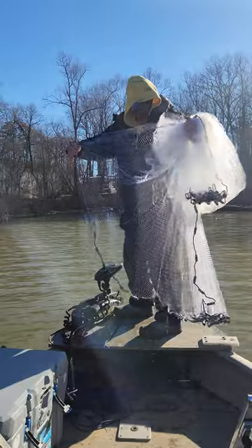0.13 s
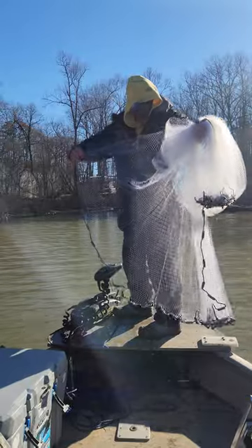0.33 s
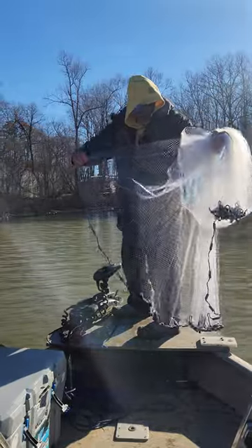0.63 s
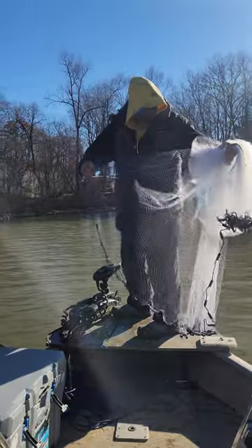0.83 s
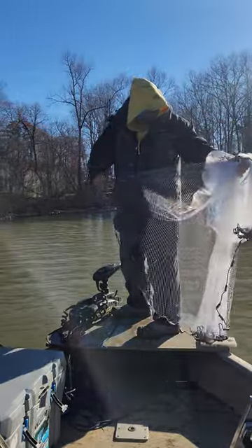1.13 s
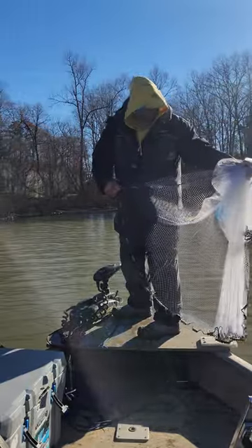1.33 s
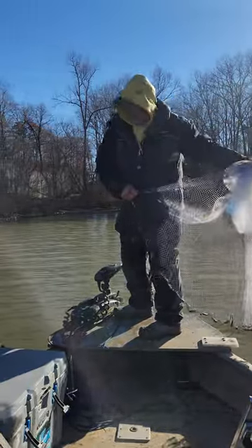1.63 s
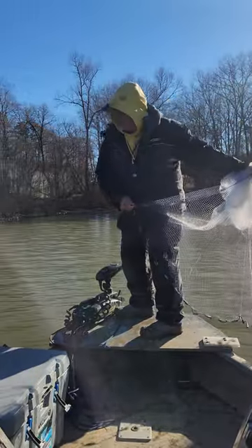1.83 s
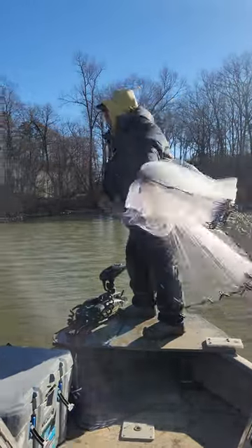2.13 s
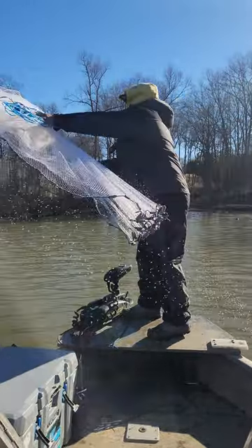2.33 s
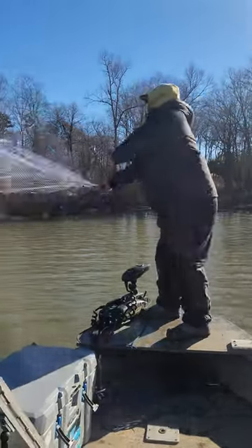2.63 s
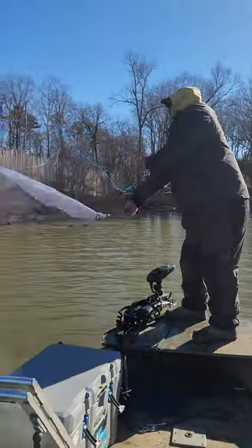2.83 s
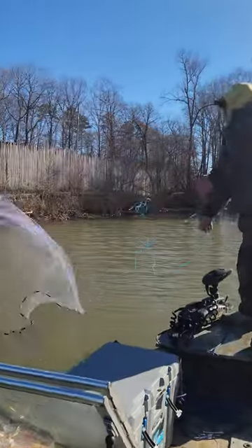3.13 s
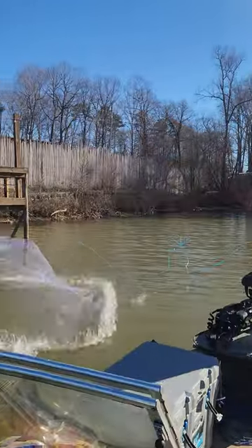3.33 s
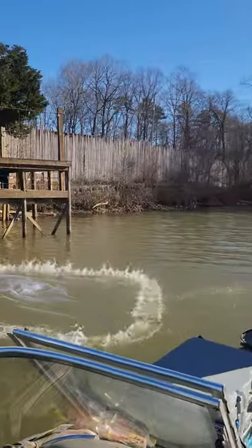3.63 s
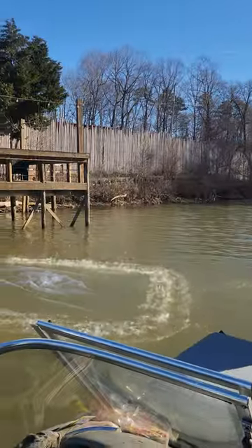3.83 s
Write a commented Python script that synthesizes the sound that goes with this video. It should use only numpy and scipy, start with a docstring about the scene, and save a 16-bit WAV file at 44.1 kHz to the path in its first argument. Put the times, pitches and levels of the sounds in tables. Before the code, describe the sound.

A cast net is readied close by, its lead weights clicking sparsely from 0.3 seconds, with a dull deck knock at 0.8. From about 2.3 to 3 seconds, mesh and jacket swish and the weights click sharply, ending with another knock. At 3.4 the net lands in a broad splash with spray, gulping bubbles, then falling drops until 4. Low wind and a faint distant motor run underneath.

```python
"""On a lake, from a boat, the microphone close to someone throwing a cast net.
Low wind rumble, faint ripples and the fading drone of a far motor lie behind. Close by, a little left,
lead weights click together and the mesh swishes through the air; the deck takes two dull knocks.
Out on the water the ring of weights lands in a broad splash: first spray, then gulping cavities
and bubbles, then falling drops."""
import sys
import numpy as np
from scipy import signal
from scipy.fft import rfft, irfft, next_fast_len
from scipy.io import wavfile
from scipy.ndimage import uniform_filter1d, map_coordinates

SR = 44100
rng = np.random.default_rng(int(sys.argv[2]) if len(sys.argv) > 2 else 0)


def persist_wave(psi):
    """Save psi, clipped to +-1, as 16-bit WAV."""
    counts = np.round(np.clip(psi, -1, 1) * 32767).astype(np.int16)
    wavfile.write(sys.argv[1], SR, np.atleast_2d(counts).T)


N = 176400
OPEN_S, TOP_HZ = .237, 15950  # the microphone's opening time and band limit


def amp(db):
    return 10 ** (np.asarray(db) / 20)


def unit(x):
    return x / np.sqrt(np.mean(x ** 2) + 1e-20)


def along(points, hz):
    """Read (freq_hz, value) points on a log axis."""
    freqs, values = np.transpose(points)
    return np.interp(np.log(hz + 1), np.log(freqs + 1), values)


def curves(rows):
    """One value per sample for each column after the time."""
    times, *columns = np.transpose(rows)
    return [np.interp(np.arange(N) / SR, times, column) for column in columns]


def ramp(start, length):
    """0 before start, rising to 1 over length."""
    return np.clip((np.arange(N) / SR - start) / length, 0, 1)


def swells(rows):
    """Bell-shaped gains from rows of centre_s, half_width_s, level_db."""
    return sum(amp(db) * np.exp(-((np.arange(N) / SR - s) / width) ** 2) for s, width, db in rows)


def wobble(rate):
    """A smooth random curve, rate knots a second."""
    return map_coordinates(rng.standard_normal(int(N * rate / SR) + 4), [np.arange(N) * rate / SR])


def filtered(x, response):
    """x times a response of frequency."""
    size = next_fast_len(N + SR // 2)
    return irfft(rfft(x, size) * response(np.fft.rfftfreq(size, 1 / SR)), size)[..., :N]


def pan(left_db):
    """Channel gains that put the left left_db above the right."""
    return amp(np.array([[left_db], [-left_db]]) / 2)


def add(out, s, x):
    """Mix x in at time s."""
    i = round(s * SR)
    out[..., i:i + x.shape[-1]] += x[..., :N - i]


def noise():
    return rng.standard_normal((2, N))


# Left-right likeness at the microphone, for far and for close sources: freq_hz, correlation
FAR_ALIKE = [(200, 0.99), (500, 0.94), (1000, 0.75), (2000, 0.65), (4000, 0)]
NEAR_ALIKE = [(300, 0.93), (700, 0.98), (1500, 0.2), (12000, 0.046)]

def spread(pair, spectrum, left_db, alike=FAR_ALIKE):
    """Two unrelated signals coloured and blended to stereo; the middle has rms 1."""
    def response(hz):
        angle = np.arccos(np.clip(along(alike, hz), -1, 1)) / 2
        return amp(along(spectrum, hz)) * [np.cos(angle), np.sin(angle)]
    mid, side = filtered(pair, response)
    out = np.array([mid + side, mid - side]) * pan(left_db)
    return out / out.mean(0).std()


def patchy(x, depth_db):
    """x with drifting patches of colour."""
    frames = signal.stft(x, nperseg=256)[2]
    patches = uniform_filter1d(rng.standard_normal(frames.shape[1:]), size=5, axis=0)
    patches = uniform_filter1d(patches, size=12, axis=1)
    return signal.istft(frames * amp(depth_db * unit(patches)), nperseg=256)[1][:, :N]


def crackle(rate, spread_db):
    """Two streams of tiny random impulses, rate a second."""
    impulses = (rng.random((2, N)) < rate / SR) * np.sign(noise())
    return unit(impulses * amp(spread_db * np.clip(noise(), -2, 2)))


def bubbles(low_hz, high_hz, cycles, count, spread_db=3, rise=0.018):
    """A stream of damped, slightly rising bubble tones."""
    when, pitch, size = rng.random((count, 3)).T[:, :, None]
    hz, t = low_hz * (high_hz / low_hz) ** pitch, np.arange(SR // 50) / SR
    age = hz * t / cycles
    strength = amp(spread_db * np.minimum(-np.log(size), 3)) * hz
    envelope = np.exp(-2 * age) * (1 - np.exp(-hz * t)) * (1 - t / t[-1])
    tones = strength * envelope * np.sin(2 * np.pi * hz * t * (1 + rise * np.minimum(age, 2)))
    at = (when * N).astype(int) + np.arange(len(t))
    return unit(np.bincount(at.ravel(), tones.ravel(), N)[:N])


# Wind at the microphone: time_s, level_db
WIND_LEVEL = [(.25, -60), (.49, -56), (.52, -45), (1.6, -42.5), (1.85, -47.5), (2.2, -44.5), (3.05, -42),
              (3.6, -44.5), (4, -46)]
# Its spectrum: freq_hz, gain_db
WIND_SPECTRUM = [(15, -36), (25, -13), (38, 1.5), (70, 1), (125, -4.5), (170, -11.5), (260, -15),
                 (400, -42), (800, -89)]

def lake_wind():
    """Gusts make a low, uneven rumble."""
    return amp(curves(WIND_LEVEL)[0] + 2 * wobble(14)) * spread(noise(), WIND_SPECTRUM, left_db=-0.5)


# Drone of a motor far across the water: time_s, level_db
DRONE_LEVEL = [(.4, -50.5), (1.3, -49.5), (2.4, -47), (3.2, -50.5)]
# Its spectrum: freq_hz, gain_db
DRONE_SPECTRUM = [(40, -11.5), (110, 4), (200, -3), (310, -1), (420, -12.5), (700, -16), (1300, -30.5),
                  (2500, -39.5), (5000, -38.5), (6500, -50), (12000, -42), (16000, -43)]
# The motor's tones: pitch_hz, level_db, width_hz
MOTOR_TONES = [(178.7, -50, 3), (225.5, -55, 6), (260, -54.5, 10), (310, -63, 18)]
# Their shared swell and fade: time_s, gain_db
MOTOR_FADE = [(.25, 0), (.78, 4), (1.5, -2.5), (2.5, -1), (3.2, -7), (4, -11)]

def far_motor():
    """A low drone with wavering tones swells, then fades, with a faint airy hiss above."""
    t = np.arange(N) / SR
    drone_gain = amp(curves(DRONE_LEVEL)[0] + 1.44 * wobble(4.81))
    drone = spread(noise(), DRONE_SPECTRUM, left_db=2.5)
    hum = sum(amp(db + wobble(6.88)) * np.sqrt(2) * np.sin(2 * np.pi * hz * t + wobble(width))
              for hz, db, width in MOTOR_TONES)
    return drone_gain * drone + amp(curves(MOTOR_FADE)[0]) * hum


# Ripples down at the hull: start_s, pitch_hz, level_db
LAPS = [(0.634, 1112, -60.5), (0.677, 1540, -68.5)]

def laps(length_s=0.037):
    """Water laps at the boat in faint, rough plips."""
    out, t = np.zeros((2, N)), np.arange(int(length_s * SR)) / SR
    for s, hz, db in LAPS:
        plip = np.sin(2 * np.pi * hz * t + wobble(hz / 2)[:len(t)])
        add(out, s, amp(db) * np.sin(np.pi * t / length_s) * plip)
    return out


# Decay of the echo from dock and bank: freq_hz, t60_s
BANK_DECAY = [(300, 0.11), (2000, 0.1), (12000, 0.17)]

def bank_echo(x):
    """The shore returns a short, diffuse echo."""
    hz, t, frames = signal.stft(rng.standard_normal((2, SR // 2)), SR, nperseg=256)
    tail = signal.istft(frames * amp(-60 * t / along(BANK_DECAY, hz)[:, None]), SR, nperseg=256)[1]
    return signal.fftconvolve(x, tail / np.linalg.norm(tail[0]), axes=1)[:, :N]


def boat_reflections(x, delays_s=(.0037, .0083, .0131, .0217), gain_db=-20):
    """The direct sound plus its first reflections off hull and windscreen."""
    return filtered(x, lambda hz: 1 + amp(gain_db) * sum(np.exp(-2j * np.pi * hz * s) for s in delays_s))


# Knocks on the deck: start_s, level_db, pitch_hz, t60_s
KNOCKS = [(0.763, -19.5, 173, 0.024), (2.983, -22, 118, 0.042)]
# A light, hollow tap on the boat: freq_hz, gain_db
TAP_SPECTRUM = [(850, -20), (1100, 0), (1600, -16), (2000, -11), (3000, -21), (5000, -16), (7700, -21),
                (11000, -36)]

def deck(tap_s=.843, tap_db=-46.5, tap_t60_s=.09):
    """Two dull knocks ring low and die fast; the tap is a dry burst of noise."""
    out, t = np.zeros((2, N)), np.arange(SR // 5) / SR
    for s, db, hz, t60 in KNOCKS:
        add(out, s, amp(db - 60 * t / t60) * np.sin(2 * np.pi * hz * t) * (1 - np.exp(-t / 0.0013)))
    tap = spread(noise(), TAP_SPECTRUM, left_db=3)[:, :len(t)]
    add(out, tap_s, amp(tap_db - 60 * t / tap_t60_s) * tap)
    return out


# The thrower's jacket, close by: centre_s, half_width_s, level_db
FLAP = (2.505, 0.0094, -43.5)

def jacket_flap():
    """The jacket flaps once as the arms fly out."""
    return swells([FLAP]) * spread(noise(), [(250, -16), (500, 0), (1500, -20), (4000, -40)], left_db=2)


# The lead line, close on the left: centre_s, half_width_s, level_db
SLIP = (2.519, 0.024, -39.5)

def rope_slip():
    """A short bright swell as the line slides off the hand."""
    return swells([SLIP]) * spread(noise(), [(2500, -11.5), (9000, -5), (16000, -1)], left_db=10)


# Jacket and net moving near the microphone: time_s, cloth_gain_db, mesh_gain_db
SWING_GAINS = [(.9, -76.5, -80.5), (1.5, -71.5, -78), (1.68, -66, -73), (2.0, -63.5, -67),
               (2.25, -60, -61.5), (2.33, -53, -57), (2.42, -56, -58), (2.5, -52, -52.5), (2.62, -57, -56),
               (2.7, -53, -54.5), (2.87, -53.5, -53.5), (3.08, -61.5, -61.5), (3.37, -58, -61)]
# Cloth rustle, mesh hiss and the mesh whipping past: freq_hz, gain_db
CLOTH_SPECTRUM = [(200, -3), (400, -0.5), (700, -1.5), (1500, -4), (2200, -7.5), (3200, -11.5),
                  (4500, -16.5), (8000, -48)]
MESH_SPECTRUM = [(1500, -27), (3200, -5), (4800, 1.5), (5600, -2), (6500, -12), (7600, -1), (9800, -6),
                 (12700, 3), (15500, -3)]
WHIP_SPECTRUM = [(1000, -5), (3000, -7), (4700, 2.5), (6500, -6), (8000, -4), (15000, -6.5)]

def swing():
    """Cloth rustles, the mesh hisses and its knots tick as the net is wound back and thrown."""
    cloth_db, mesh_db = curves(SWING_GAINS)
    flutter_db = .9 * wobble(16)
    cloth_gain = amp(cloth_db + 3 + flutter_db + 1.4 * wobble(30.09))
    cloth = spread(patchy(noise(), depth_db=1.8), CLOTH_SPECTRUM, left_db=-3.5, alike=NEAR_ALIKE)
    knots = .6 * crackle(rate=200, spread_db=3.5) + 0.36 * crackle(rate=24, spread_db=3)
    mesh_gain = amp(mesh_db + 3.5 + flutter_db + wobble(45))
    mesh = spread(patchy(noise() + knots, depth_db=2.5), MESH_SPECTRUM, left_db=4.5, alike=NEAR_ALIKE)
    whip_gain = amp(-46.5) * np.sin(np.pi * ramp(start=2.272, length=0.14))
    whip = spread(noise(), WHIP_SPECTRUM, left_db=2.5, alike=NEAR_ALIKE)
    return (cloth_gain * cloth + mesh_gain * mesh) * ramp(0.71, 0.31) + whip_gain * whip


# Lead weights meeting, close on the left: start_s, level_db, pitch_hz, left_db, rattle_db
CLICKS = [(.296, -31, 8300, 4.5, 2), (.371, -32, 8900, 6, -1), (0.526, -39.5, 4400, 2, -14),
          (.763, -19.5, 5850, 5.5, -22), (.989, -45, 3100, 7, -16), (1.158, -38.5, 8100, 10, -5),
          (1.72, -44, 12900, 13, -22), (2.385, -22, 9750, 5, -5), (2.44, -23, 11500, 4, 0),
          (2.512, -16.5, 9800, 6, -7), (2.586, -13, 9800, 6, -14.5), (2.687, -27, 11000, 8, -11),
          (2.805, -9, 6270, 13, -29), (2.874, -21, 11000, 7, -22), (2.973, -29.5, 9012, 7, -10),
          (3.0593, -27, 4250, 1.5, 9.5)]
# Modes of one weight: pitch_ratio, gain_db
LEAD_MODES = [(.8, -1), (1.2, 0), (1.85, -6)]

def lead_weights(click_t60_s=0.0018, rebound_gap_s=0.0026, rebound_loss_db=3, scatter_t60_s=0.077):
    """Each meeting is a dead click, three quick rebounds and a scatter; small leads radiate no bass."""
    out, t = np.zeros((2, N)), np.arange(SR // 20) / SR
    envelope = amp(-60 * t / click_t60_s) * (1 - np.exp(-t / 0.00018))
    for s, db, hz, left_db, rattle_db in CLICKS:
        band = signal.butter(3, [min(hz * 0.52, 8000), TOP_HZ], "band", fs=SR, output="sos")
        for bounce in range(4):
            phases = rng.uniform(0, 2 * np.pi, (len(LEAD_MODES), 2, 1))
            tunings = 1 + 0.06 * rng.standard_normal(len(LEAD_MODES))
            ring = sum(amp(mode_db) * np.sin(2 * np.pi * min(hz * ratio * tune, TOP_HZ) * t + phase)
                       for (ratio, mode_db), tune, phase in zip(LEAD_MODES, tunings, phases))
            click = signal.sosfilt(band, ring * envelope)
            delay = rebound_gap_s * bounce * rng.uniform(.9, 1.7)
            bounce_db = rattle_db - rebound_loss_db * (bounce + 1.5) if bounce else 0
            add(out, s + delay, pan(left_db) * amp(db + bounce_db) * click)
        scatter = signal.sosfilt(band, rng.standard_normal((2, len(t))))
        scatter_db = db - 13.5 + rattle_db / 2 - 60 * t / scatter_t60_s
        add(out, s, pan(left_db) * amp(scatter_db) * scatter)
    return out


def falling_drops():
    """Thrown-up drops rain back on the lake with short bright plinks."""
    plinks = np.array([bubbles(low_hz=3900, high_hz=5900, cycles=9, count=1200) for _ in range(2)])
    return amp(-46) * ramp(start=3.79, length=0.099) * pan(5) * plinks


# Air cavities where the net lands: start_s, length_s, start_pitch_hz, level_db
GULPS = [(3.472, 0.04, 880, -26.5), (3.535, 0.046, 600, -26), (3.568, 0.03, 340, -26.5),
         (3.604, 0.046, 460, -23), (3.641, 0.036, 680, -28), (3.667, .022, 400, -28),
         (3.688, .024, 560, -27.5), (3.699, .046, 450, -26.5)]

def gulps(fall_oct_per_s=11, rough_rad=.5, rough_db=2.5):
    """Cavities deepen behind the sinking weights, so their rough tones fall."""
    out = np.zeros((2, N))
    for s, length, hz, db in GULPS:
        t = np.arange(int(length * SR)) / SR
        pitch_hz = hz * 2 ** (-fall_oct_per_s * t)
        phase = 2 * np.pi * np.cumsum(pitch_hz) / SR + rough_rad * wobble(264)[:len(t)]
        envelope = amp(db + rough_db * wobble(265)[:len(t)]) * np.sin(np.pi * t / length)
        add(out, s, pan(1.5) * envelope * np.sin(phase))
    return out


# Stretches of lead line hitting the lake: centre_s, half_width_s, level_db
SLAPS = [(3.469, 0.0043, -33), (3.521, .007, -27.5), (3.573, 0.0081, -32.5), (3.650, 0.013, -29),
         (3.709, 0.0086, -26)]
# Slapped and churned water: freq_hz, gain_db
SLAP_SPECTRUM = [(200, -15), (400, 2), (800, 3), (1800, -5), (3200, -13), (5000, -24)]
CHURN_SPECTRUM = [(120, -19), (210, -16), (270, 6), (400, -3), (600, 2), (900, -7), (1500, -22)]

def plunge():
    """The line slaps down and the water churns while the weights go under."""
    sinking = ramp(start=3.457, length=0.014) * (1 - ramp(start=3.73, length=.03))
    churn = amp(-37 + 0.97 * wobble(50)) * sinking * spread(noise(), CHURN_SPECTRUM, left_db=-1.5)
    return churn + swells(SLAPS) * spread(noise(), SLAP_SPECTRUM, left_db=1.5)


# Bubbles and spray, a net's throw from the microphone: time_s, gain_db
BUBBLE_GAIN = [(3.39, -58), (3.412, -52), (3.418, -44.5), (3.45, -42), (3.475, -31.5), (3.52, -30),
               (3.61, -35), (3.74, -35.5), (3.82, -38.5), (3.92, -35.5), (4, -37.5)]
SPRAY_GAIN = [(3.39, -43.5), (3.455, -43), (3.495, -34), (3.525, -37), (3.575, -35.5), (3.64, -37),
              (3.68, -42), (3.75, -41), (3.83, -44), (3.92, -41), (4, -42.5)]
# Their spectra: freq_hz, gain_db
BUBBLE_SPECTRUM = [(150, -30), (300, -6), (450, 3), (800, 0.5), (1100, -3.5), (1800, -3.5), (2400, -8),
                   (3200, -12), (4000, -23), (7000, -36)]
SPRAY_SPECTRUM = [(1500, 1.5), (3000, 5), (4200, -1), (5400, 2.5), (6700, -3.5), (7700, 2), (10000, -5.5),
                  (12500, 0), (15500, -5)]
# The spray's lean to the left: freq_hz, left_db
SPRAY_LEFT = [(3000, 3), (4400, 7), (8000, 11.5), (15000, 9.5)]
# Single bright spatters: centre_s, half_width_s, level_db
SPATTERS = [(3.417, 0.0028, -45.5), (3.492, 0.0023, -33), (3.549, 0.0015, -33.5), (3.581, 0.0012, -36.5),
            (3.745, 0.0014, -36.5), (3.932, 0.0011, -38)]

def splash(touchdown_s=3.386):
    """From touchdown on, a swarm of bubbles rings and the spray hisses and spatters."""
    swarm = np.array([bubbles(low_hz=688, high_hz=4026, cycles=24, count=3800) for _ in range(2)])
    fizz_gain = amp(curves(BUBBLE_GAIN)[0] - 1 + 1.26 * wobble(90))
    froth = swarm + 1.1 * noise() + .5 * crackle(rate=2300, spread_db=6.5)
    fizz = spread(froth, BUBBLE_SPECTRUM, left_db=0.4)
    droplets = patchy(noise() + .7 * crackle(rate=2000, spread_db=5), depth_db=1.7)
    spray = spread(droplets, SPRAY_SPECTRUM, left_db=0)
    spray = filtered(spray, lambda hz: amp(np.array([[1], [-1]]) * along(SPRAY_LEFT, hz) / 2))
    spray_gain = amp(curves(SPRAY_GAIN)[0] - 1.5 + wobble(90)) + swells(SPATTERS)
    return (fizz_gain * fizz + spray_gain * spray) * ramp(touchdown_s, 0.006)


def scene():
    """Lake, boat and net as heard from the deck; only the landing echoes."""
    landing = boat_reflections(splash() + plunge() + falling_drops()) + gulps()
    net = swing() + lead_weights() + rope_slip()
    delays_s = np.array([[0], [0.000292]])  # the net's sound reaches the microphone's left side first
    net = filtered(net, lambda hz: np.exp(-2j * np.pi * hz * delays_s))
    lake = lake_wind() + far_motor() + laps()
    return lake + jacket_flap() + deck() + net + landing + amp(-17) * bank_echo(landing)


def record(dry):
    """The microphone opens just after the start and keeps nothing above its band limit."""
    return filtered(dry * ramp(OPEN_S, 0.0092), lambda hz: hz < TOP_HZ)


dry = scene()
out = record(dry)
persist_wave(out)
```